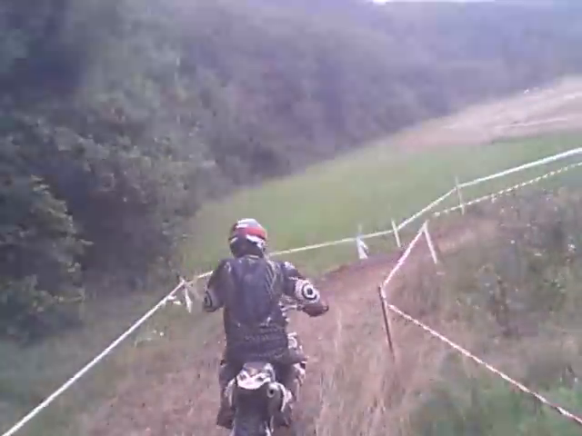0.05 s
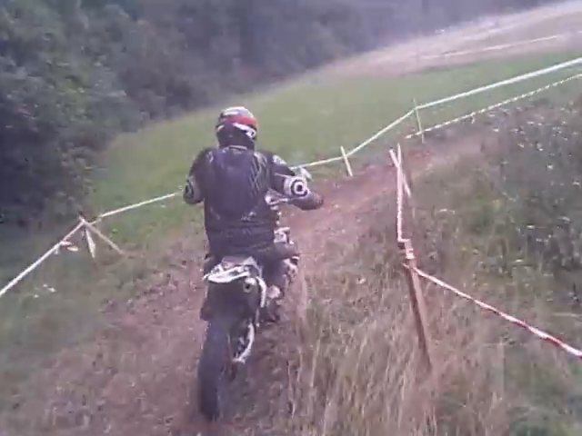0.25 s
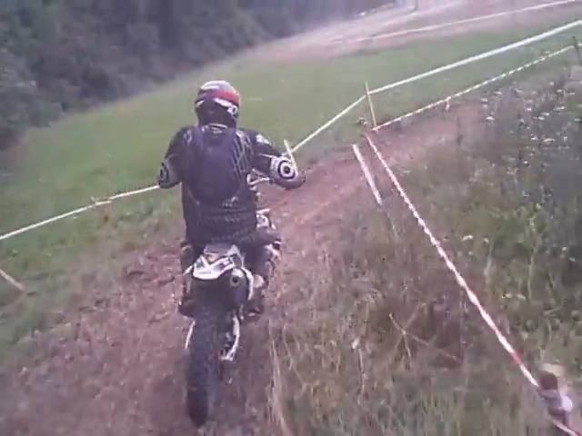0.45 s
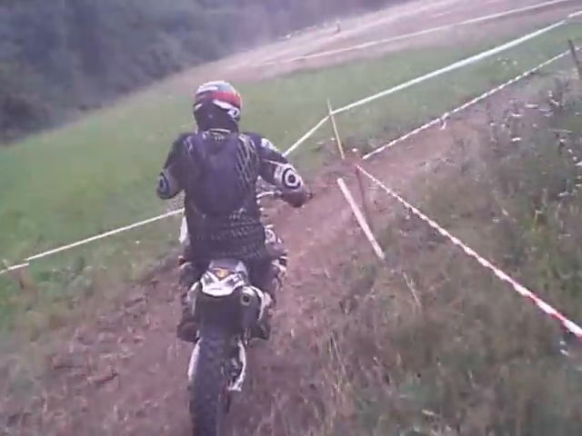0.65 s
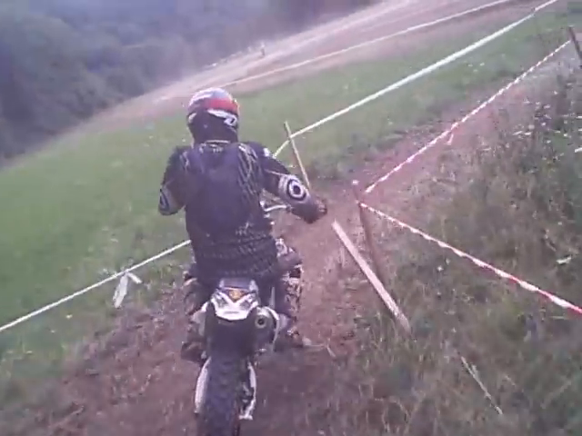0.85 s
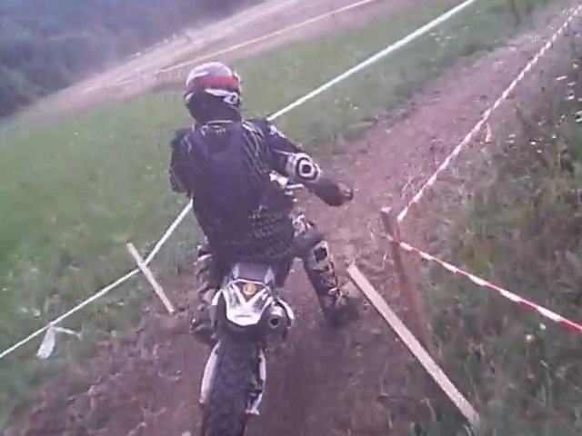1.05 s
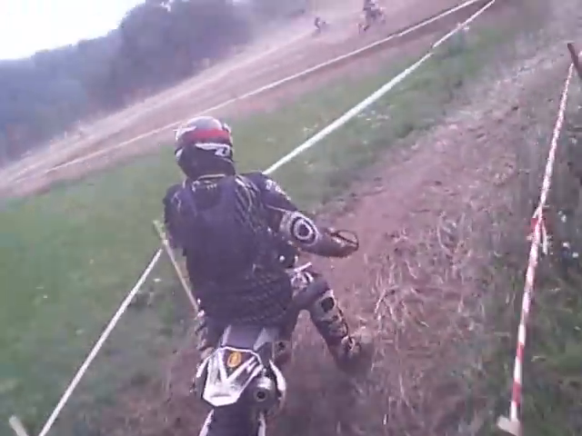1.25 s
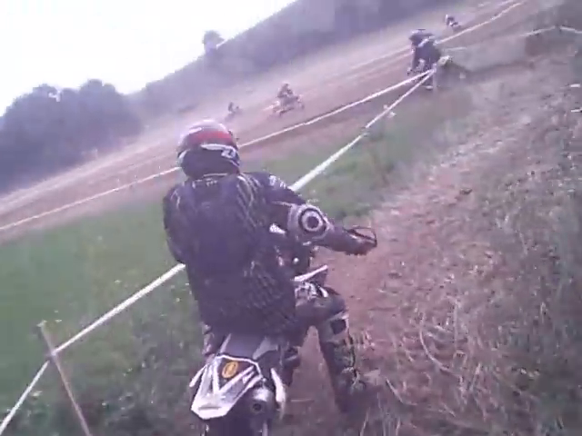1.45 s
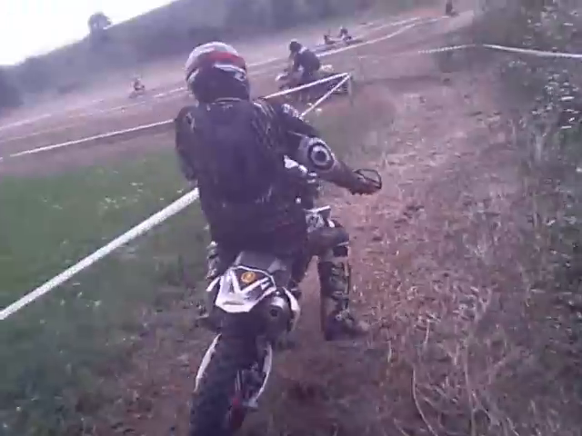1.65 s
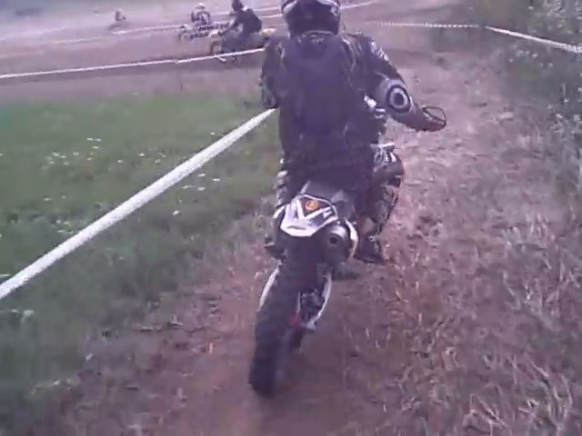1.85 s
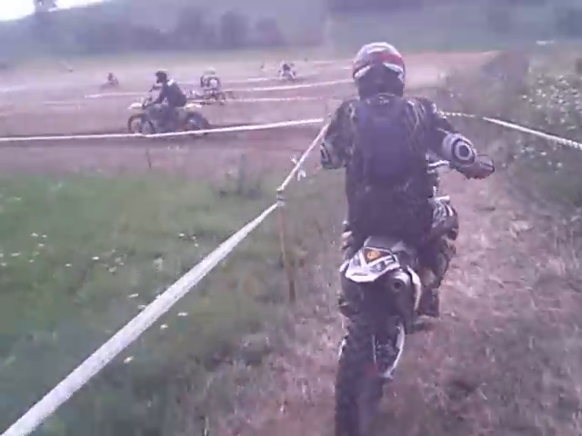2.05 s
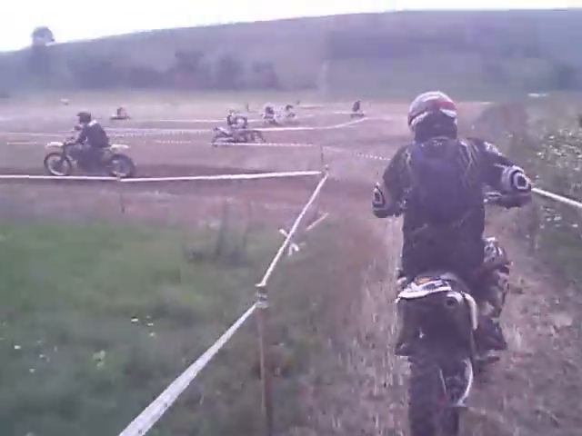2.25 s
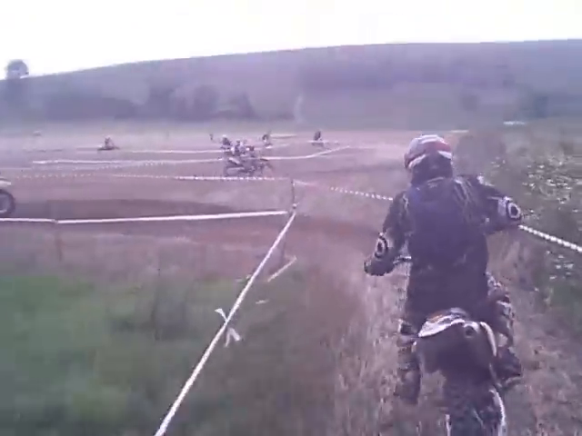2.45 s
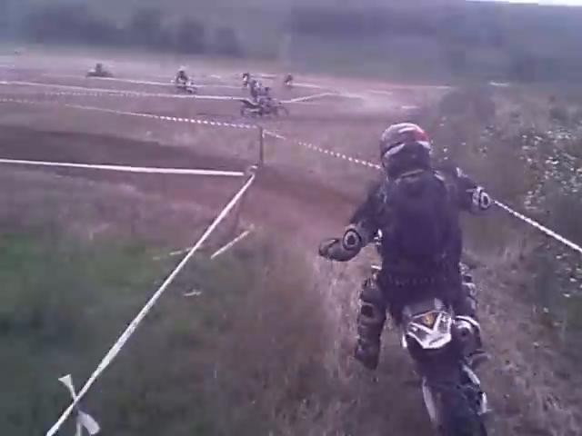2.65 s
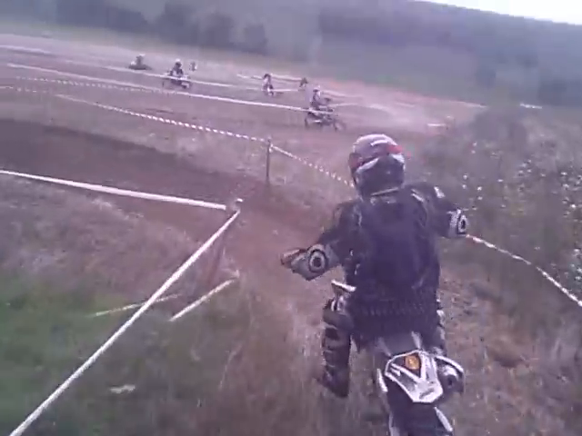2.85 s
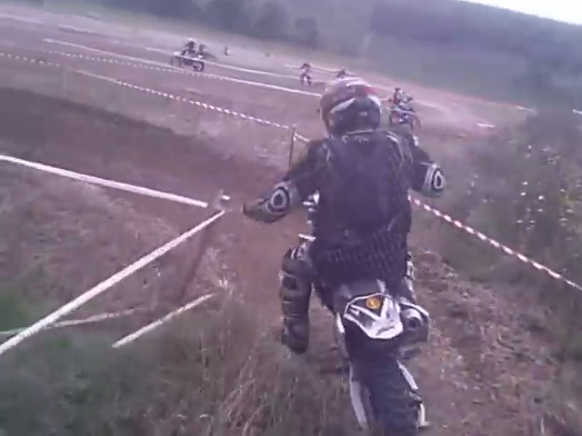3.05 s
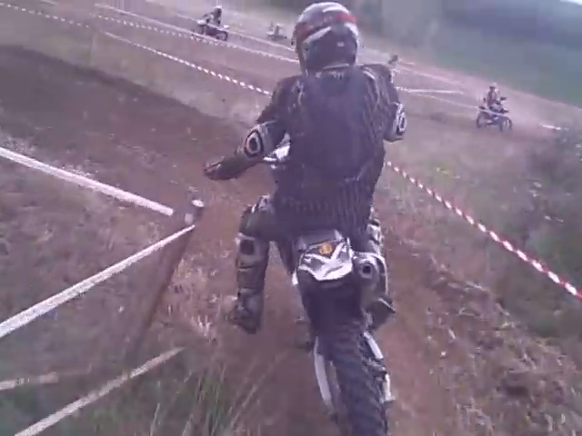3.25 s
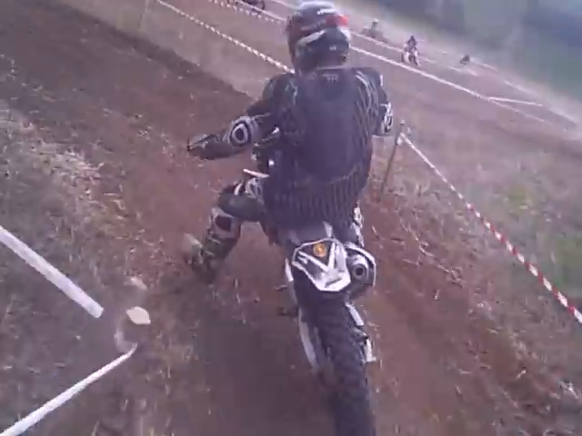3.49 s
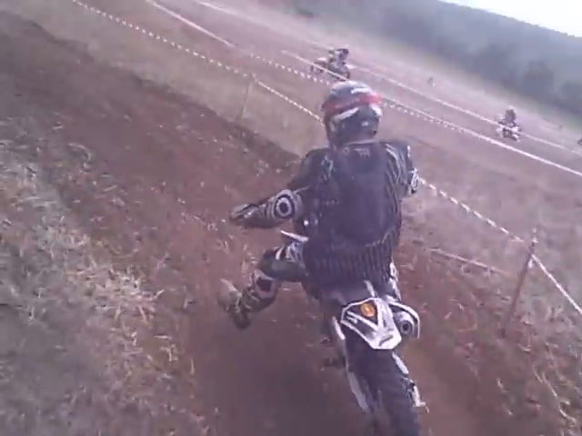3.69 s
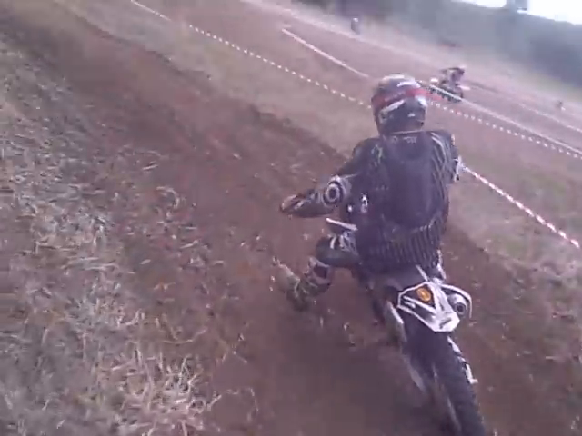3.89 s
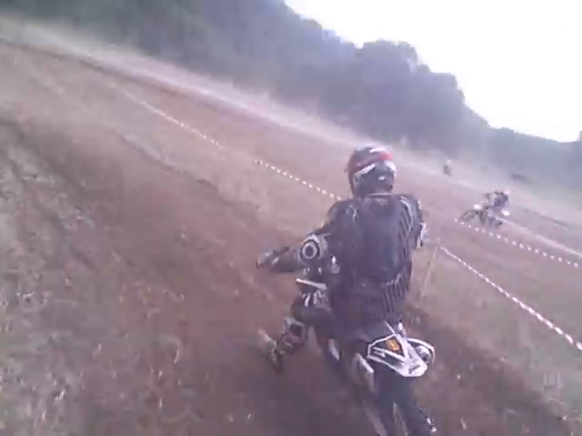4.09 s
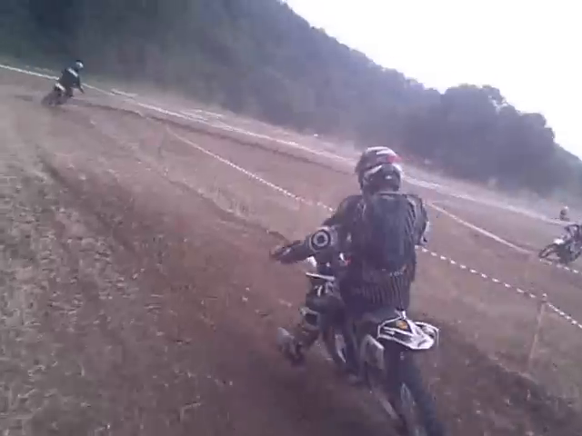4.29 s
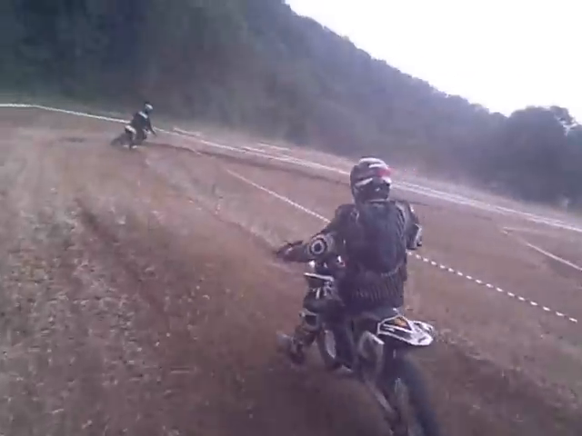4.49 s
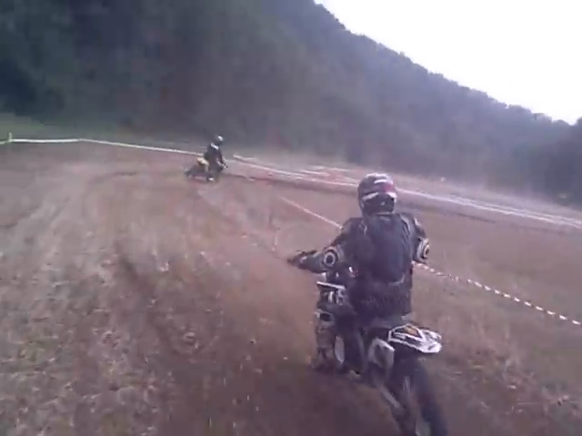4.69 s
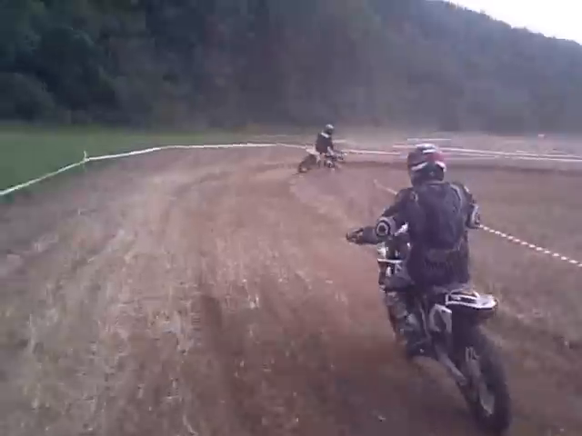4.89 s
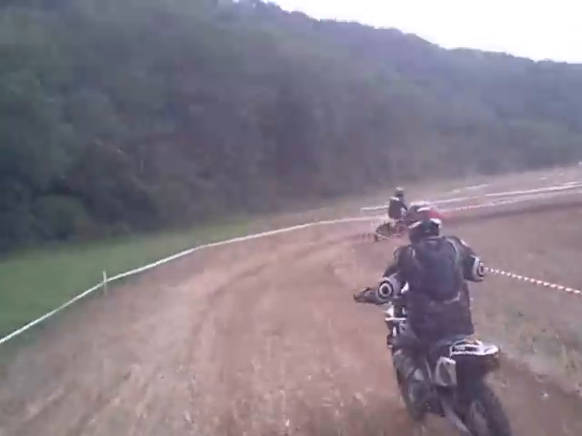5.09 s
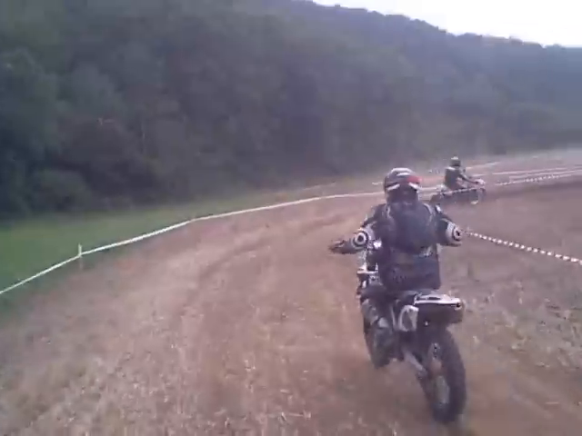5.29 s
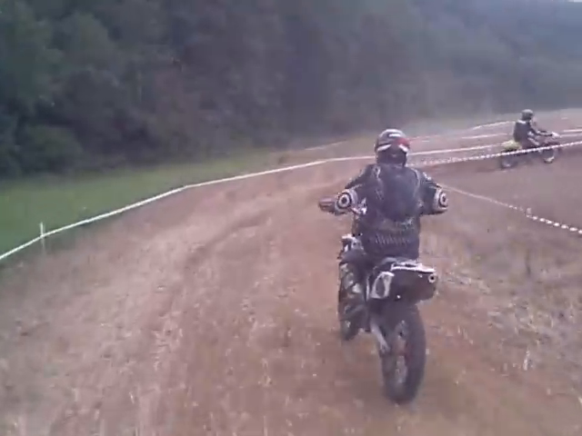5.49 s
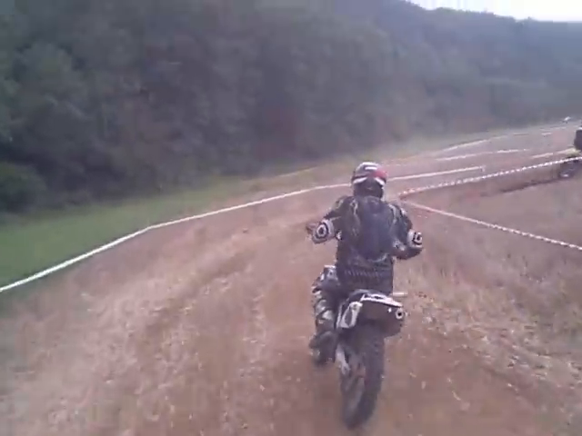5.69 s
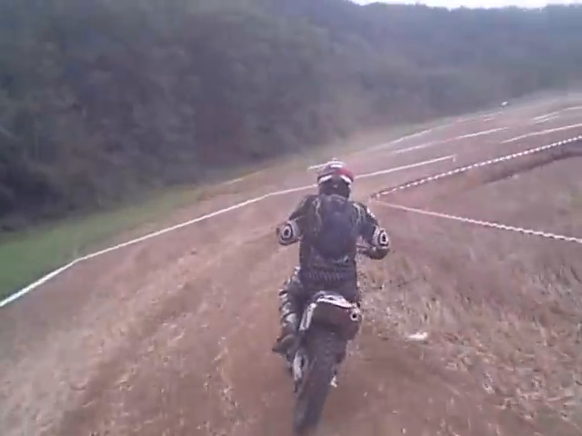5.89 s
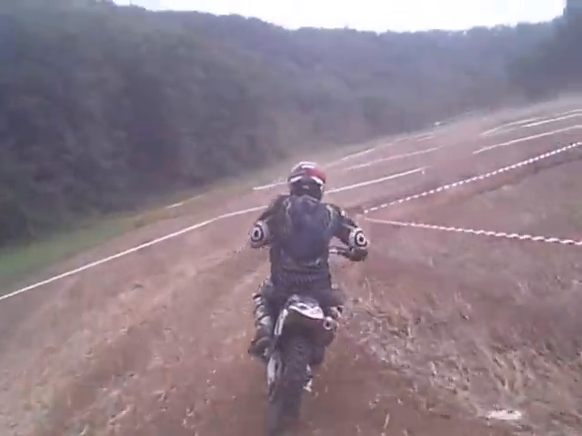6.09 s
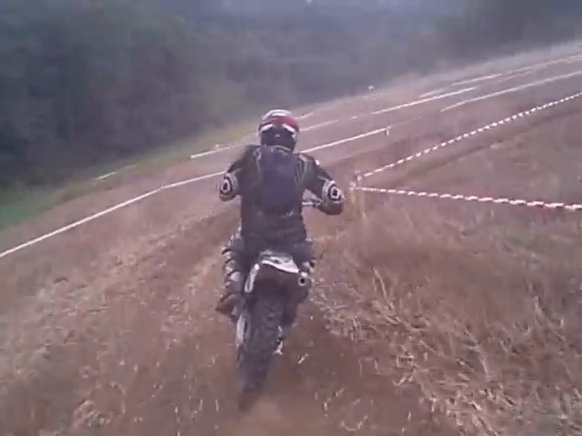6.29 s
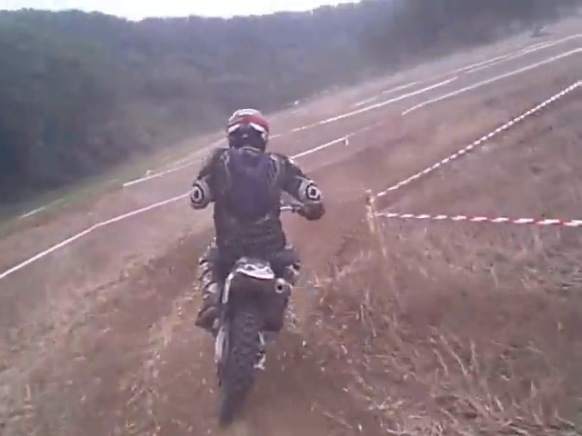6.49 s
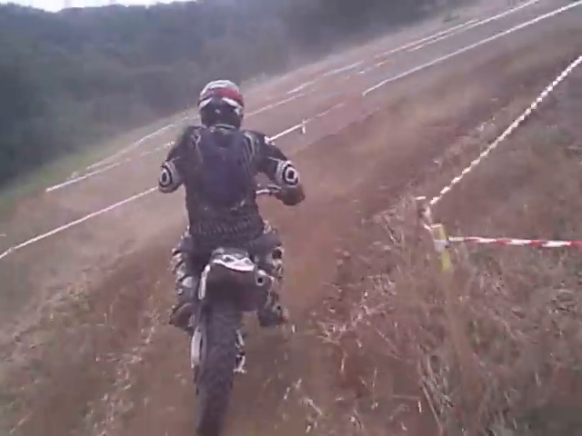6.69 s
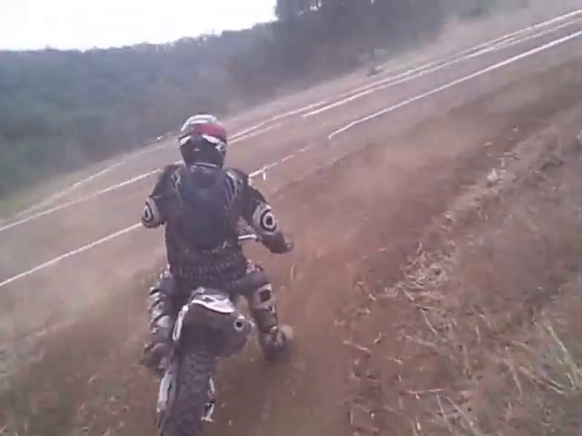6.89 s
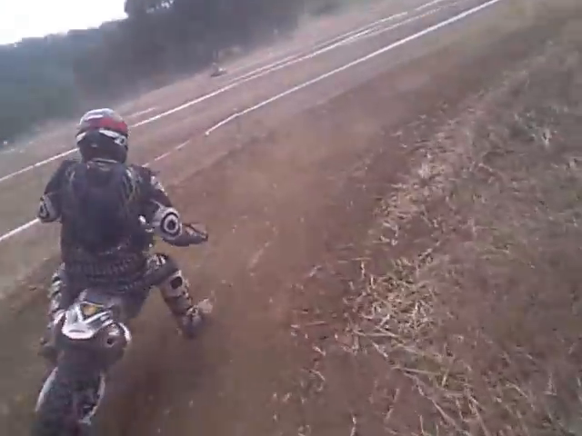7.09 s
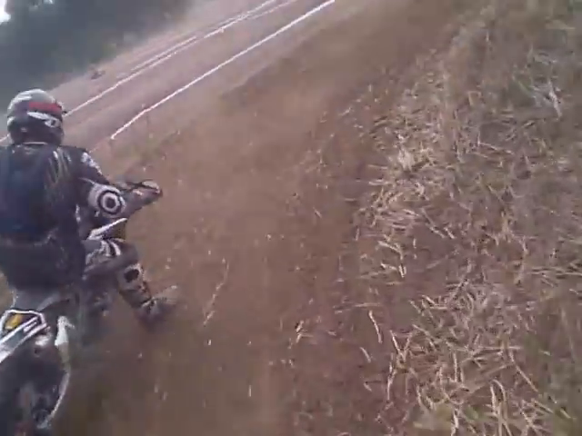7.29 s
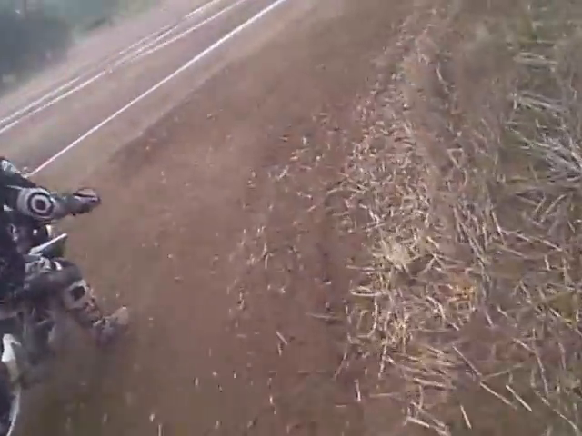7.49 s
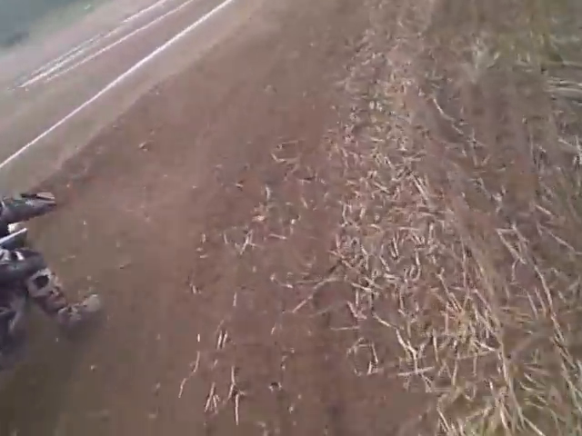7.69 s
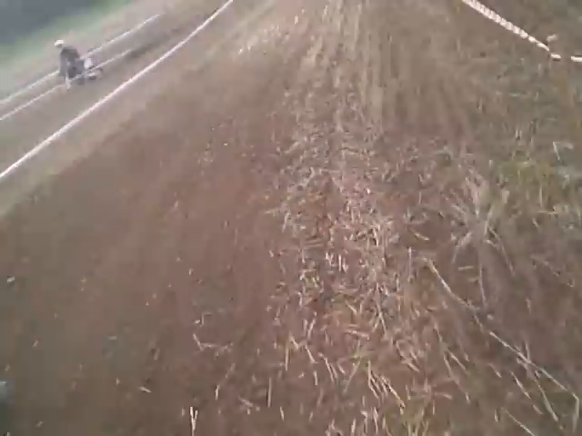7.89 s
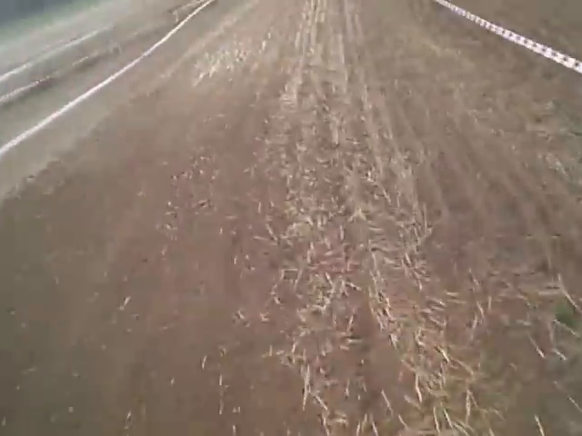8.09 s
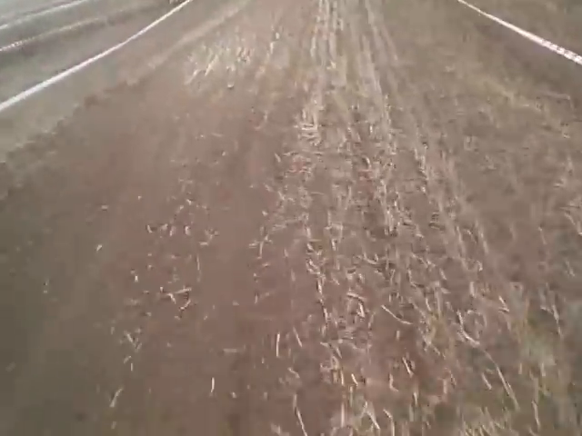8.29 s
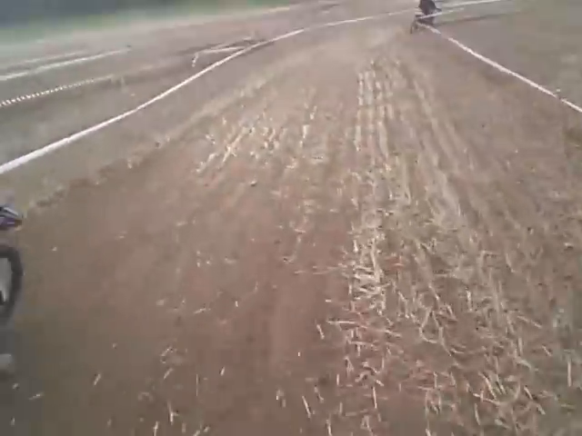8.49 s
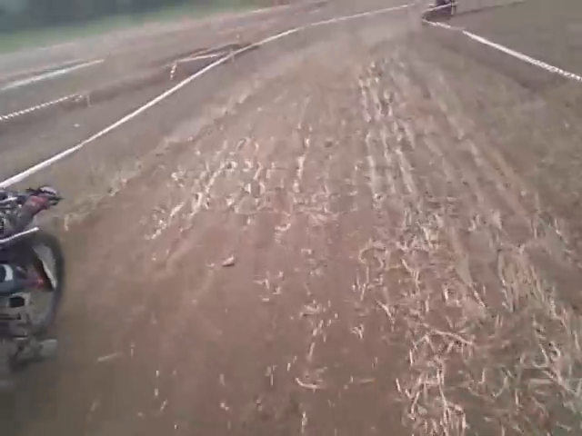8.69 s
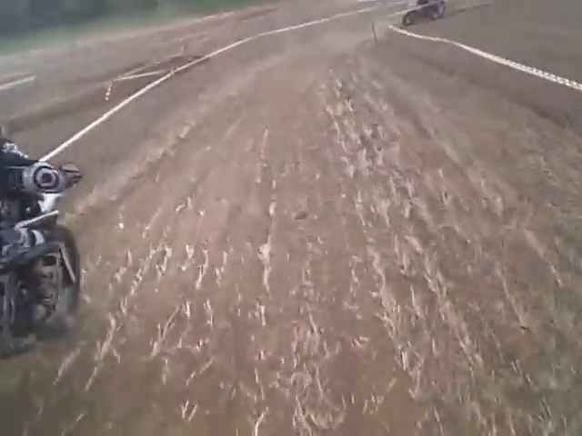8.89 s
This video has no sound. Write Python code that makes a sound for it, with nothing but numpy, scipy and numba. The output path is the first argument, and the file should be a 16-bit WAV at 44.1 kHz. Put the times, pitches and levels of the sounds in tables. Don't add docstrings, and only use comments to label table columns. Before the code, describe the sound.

From a sealed helmet camera, a muffled engine drones and roars while a leading dirt bike rasps in bursts and dirt ticks against the case.

```python
import sys
import numpy as np
from scipy import signal
from scipy.fft import rfft, irfft
from scipy.io import wavfile
from scipy.ndimage import uniform_filter1d
from numba import njit

SR = 44100
rng = np.random.default_rng(int(sys.argv[2]) if len(sys.argv) > 2 else 0)


def transcribe(signal):
    frames = np.atleast_2d(signal).T
    limited = np.clip(frames, -1, 1)
    pcm = np.round(limited * 32767).astype(np.int16)
    wavfile.write(sys.argv[1], SR, pcm)


def volts(x):
    e = np.asarray(x, float) / 20
    return 10 ** e


N = 394630
TIME = np.arange(N) / SR

# (frequency [Hz], level [dB])
CASE_TONE = [(470, -55.5), (800, -15.5), (1250, -8), (1450, 1.5), (2400, -15), (3080, -18), (3550, -17.5),
             (4680, -20), (6080, -8), (6860, -0.5), (7660, 2.5), (8550, -4.5), (11000, -27.5), (14300, -17),
             (22000, -120)]
# (frequency [Hz], level [dB])
FRAME_TONE = [(60, 1.5), (100, 3), (230, -8), (300, 0.5), (360, -8), (600, -8), (850, -6.5), (1000, -1.5),
              (1300, -29.5)]
# (frequency [Hz], level [dB])
SHAKE_TONE = [(2, -2), (6, 4.5), (14, -7), (24, -14), (45, -17.5), (60, -15), (80, -23.5), (200, -63.5)]
# (time [s], length [s], shake of the case [dB], tyre noise [dB])
RUTS = [(0.0, 0.033, -5, 3), (0.472, 0.026, -1, 3), (0.678, 0.02, 3.5, 2.5), (1.543, 0.27, 3.5, 0),
        (2.394, 0.051, 8.5, 4), (2.746, 0.17, 6, 0.5), (3.077, 0.19, 1.5, 0.5), (3.299, 0.028, 1, 2),
        (3.5, .1, 6, 1.5), (4.643, .05, 1, 4.5), (4.98, .06, 2, 0), (5.32, 0.037, -1, 2),
        (5.743, 0.077, -3.5, 1), (5.94, 0.034, -2, 2), (6.146, 0.055, -0.5, 2.5), (6.3, .03, 0, 1.5),
        (6.477, .04, -2, 4.5), (7.75, 0.034, -3, 3.5), (7.966, .04, 1, 1.5), (8.24, .03, 5, 4),
        (8.703, 0.11, 2, 3.5)]
BUFFET_DB, BUFFET_DB_PER_S = -54, -0.2

# (time [s], level [dB], length [s])
FAR_SWELLS = [
    (.05, -68.5, 0.093),
    (0.494, -66, .07),
    (0.675, -66, 0.042),
    (5.98, -68.5, 0.13),
    (6.68, -73, 0.11),
]
FAR_HZ, FAR_LO_HZ, FAR_HI_HZ = 88.3, 700, 1200
# (time [s], peak level [dB], ringing frequency [Hz])
KNOCKS = [
    (1.221, -48, 1210),
    (2.348, -57, 100),
    (3.451, -50, 120),
    (5.254, -29, 2636),
    (8.234, -39, 807),
]
# (time [s], peak level [dB], length [s])
DIRT_HITS = [
    (0.628, -54.5, 0.021),
    (2.9, -55, .04),
    (4.642, -32, 0.042),
    (6.158, -55, .002),
    (6.182, -41.5, 0.0066),
    (6.475, -47.5, 0.015),
    (6.708, -57.5, 0.055),
    (7.751, -35, .02),
    (7.967, -35, .03),
    (8.747, -27.5, 0.0022),
]

# (time [s], firing rate [Hz], drone level [dB])
OWN_ENGINE = [(0, 40.9, -69), (2.0, 46.8, -73), (2.3, 49.9, -78), (2.8, 48.6, -69), (3.5, 51.2, -83),
              (4.3, 65.8, -61.5), (4.59, 81.8, -56), (4.62, 58, -66), (4.8, 58.5, -91),
              (5.42, 74.34, -59.5), (5.63, 74.7, -57.5), (5.8, 60.98, -81), (6.1, 56.3, -72),
              (7.3, 53.6, -72), (7.56, 69, -66), (7.63, 52.1, -89), (8.3, 76.2, -62), (8.95, 82.4, -62.5)]
# (time [s], intake hiss level [dB])
OWN_THROTTLE = [(0, -60.5), (1.0, -60), (1.85, -47), (2.08, -47), (2.13, -50), (2.99, -55), (3.3, -51.5),
                (3.95, -51), (4.55, -40), (4.63, -38.5), (5.59, -36), (5.66, -51), (6.75, -59.5),
                (7.15, -56.5), (7.5, -34.5), (8.2, -38.5), (8.74, -36.5), (8.95, -45.5)]
CUT_S, CUT_LENGTH_S, CUT_DB = 7.665, 0.074, -13.5
LOAD_DB = -50
ROAR_DB, ROAR_FOLLOWS = -53, 0.52
RUMBLE_DB, RUMBLE_FOLLOWS, RUT_RUMBLE = -67, 0.61, 1.4
WHINE_DB, WHINE_FOLLOWS, WHINE_HZ, WHINE_WIDTH_HZ = -76, 0.98, 470, 35
DRONE_WANDER_DB = 2.2
# (start [s], end [s], share at start [0-1], share at end [0-1])
RATTLES = [
    (4.69, 5.3, 0, 0),
    (5.82, 6.3, 0.41, .15),
    (6.287, 6.773, 0.35, 0.59),
    (7.79, 8.305, .3, 0),
]
RATTLE_IDLE, RATTLE_ROAR_DB = 0.042, 3.5

# (time [s], bark level [dB], pipe ringing frequency [Hz], how squarely the tailpipe faces the camera [dB])
OTHER_SOUND = [
    [(1.25, -59, 1510, 2), (1.37, -57, 1530, 4), (1.6, -50, 1570, 4), (1.9, -49, 1560, 1.5),
     (2.12, -47, 1530, -3)],
    [(3.04, -58, 1527, -1), (3.22, -51, 1550, 1.5), (3.55, -56, 1560, 4), (3.72, -51, 1530, -5),
     (4.1, -52, 1550, -1.5), (4.4, -41, 1560, -10), (4.7, -43.5, 1464, -0.5), (5.28, -45.5, 1600, -8),
     (5.44, -53, 1720, 9)],
    [(7.0, -66, 1480, -1), (7.2, -49, 1560, 1), (7.6, -54.5, 1560, 12.5), (7.78, -39.5, 1480, 1),
     (8.19, -44.5, 1694, -1), (8.3, -46.5, 1620, 6), (8.42, -43, 1652, 2), (8.82, -43.5, 1748, 1),
     (8.94, -69, 1622, 0)],
]
# (time [s], firing rate [Hz])
OTHER_REVS = [
    [(1.237, 47.78), (1.297, 44.61), (1.597, 39.9), (1.817, 44.95), (1.917, 44.73), (2.12, 47.65)],
    [(3.022, 39.43), (3.102, 37.6), (3.822, 47.84), (4.062, 47.14), (4.522, 61.82), (4.742, 61.59),
     (4.862, 66.77), (5.322, 74.95), (5.44, 69.68)],
    [(6.996, 45.5), (7.216, 53.64), (7.296, 48.87), (7.656, 54.26), (7.956, 65.59), (8.256, 83.92),
     (8.576, 87.99), (8.656, 96.33), (8.94, 83.15)],
]
# (time [s], level against their neighbours [dB])
POPS = [(1.392, 4.7), (1.866, -17), (1.888, 2), (1.955, 2.5), (1.999, -4), (2.063, 2.5), (3.152, 6.5),
        (3.204, 5.3), (3.23, -5.8), (3.402, 1), (3.424, 4), (3.518, 0), (3.972, 2), (4.036, -20),
        (4.057, 8.5), (4.078, 4), (4.099, 5), (4.2, 8), (4.275, 7.5), (4.382, -4), (4.435, 1.5), (5.183, 1),
        (5.223, -15), (7.199, -2.5), (8.208, 5), (8.864, 5.3)]
# (time [s], level [dB], length [s])
BOOMS = [
    (2.02, 7, 0.1),
    (2.4, 4.5, .12),
    (3.15, 0, 0.092),
    (4.22, 13, 0.044),
    (4.57, 0, .04),
    (7.25, 0.5, 0.19),
    (7.86, 3, 0.045),
]
COAST_END_S, COAST_END_HZ = 2.54, 51.5
CRUISE_HZ = 45
RASP_DB, RASP_DB_PER_HZ, CRACK_DB, CRACK_DB_PER_HZ = -13, 0.228, -4, 0.2188
PIPE_WANDER_HZ, GAS_WANDER_DB = 40, 1.5
THUMP_DB, THUMP_FOLLOWS, THUMP_FADE_DB_PER_HZ = -70, 0.45, 0.26


def unit(x):
    return x / np.sqrt(np.mean(x ** 2))


def noise():
    return rng.standard_normal(N)


def curves(rows):
    s, *columns = np.transpose(rows)
    return [np.interp(TIME, s, c) for c in columns]


def bumps(rows):
    return sum(height * np.exp(-.5 * ((TIME - s) / length) ** 2) for s, height, length in rows)


def loudness_bumps(rows):
    return bumps([(s, volts(db), length) for s, db, length in rows])


def ruts(axis):
    return bumps(np.array(RUTS)[:, [0, axis, 1]])


def walk(rate):
    k = int(SR / rate)
    steps = np.repeat(rng.standard_normal(N // k + 1), k)
    smooth = uniform_filter1d(uniform_filter1d(steps, k), k)
    return unit(smooth[:N])


def colour(x, points):
    size = 2 ** 15
    hz, db = np.transpose(points)
    bins_hz = np.fft.rfftfreq(size, 1 / SR) + 1
    gain = volts(np.interp(np.log(bins_hz), np.log(hz), db))
    cep = irfft(np.log(gain), size)
    cep[1:size // 2] *= 2
    cep[size // 2 + 1:] = 0
    response = irfft(np.exp(rfft(cep)), size)
    return signal.fftconvolve(x, response)[:N]


def band(x, lo_hz, hi_hz):
    return signal.sosfilt(signal.butter(2, [lo_hz, hi_hz], "bandpass", fs=SR, output="sos"), x)


@njit
def ring(x, hz, width):
    y, b, l = np.empty(len(x)), 0., 0.
    for i in range(len(x)):
        g, k = np.tan(np.pi * hz[i] / SR), width / hz[i]
        v = (b + g * (x[i] - l)) / (1 + g * (g + k))
        b, l, y[i] = 2 * v - b, l + 2 * g * v, k * v
    return y


def steady_ring(x, hz, width):
    return ring(x, np.full(N, float(hz)), float(width))


def firings(turns, hz, jitter, scatter_db):
    at = np.flatnonzero(np.diff(np.floor(turns)) > 0)
    chance = rng.standard_normal((2000, 2))[:len(at)]
    at = np.clip(at + (jitter * chance[:, 0] * SR / hz[at]).astype(int), 0, N - 1)
    size_db = scatter_db * 45 / np.maximum(hz[at], 45) * chance[:, 1]
    out = np.zeros(N)
    out[at] = volts(size_db) * np.sqrt(SR / hz[at])
    return out


def puff(pulses, rise_s, fall_s):
    t = np.arange(2048) / SR
    return signal.fftconvolve(pulses, (1 - np.exp(-t / rise_s)) * np.exp(-t / fall_s))[:N]


def buffet():
    level_db = BUFFET_DB + BUFFET_DB_PER_S * TIME + ruts(axis=2)
    return volts(level_db) * unit(colour(noise(), SHAKE_TONE))


def far_bike():
    hz = FAR_HZ * (1 + .05 * walk(3))
    pulses = firings(np.cumsum(hz / SR), hz, jitter=.03, scatter_db=4.0)
    buzz = unit(band(unit(pulses) + noise(), FAR_LO_HZ, FAR_HI_HZ))
    return loudness_bumps(FAR_SWELLS) * buzz


def knocks():
    out = np.zeros(N)
    for s, db, hz in KNOCKS:
        t = np.maximum(TIME - s, 0)
        out += volts(db) * np.exp(-t * hz / 2.0) * np.sin(2 * np.pi * hz * t)
    return out


def spray():
    grit = noise() * volts(3.1 * walk(900))
    return loudness_bumps(DIRT_HITS) * unit(band(colour(grit, CASE_TONE), 4900, 14500))


def own_drone(cycle):
    # (order, level [dB])
    levels = [(1, -18), (2, -2.5), (3, -8.5), (4, -3.0), (5, -15), (6, -19.5), (10, -15.5), (12, -17), (14, -19)]
    orders = sum(volts(db + DRONE_WANDER_DB * walk(5)) * np.sin(k * cycle) for k, db in levels)
    return .5 * orders + 1.5 * steady_ring(orders, 303, 45)


def intake_hiss(flutter):
    rush = unit(band(colour(noise(), CASE_TONE), 3630, 11700))
    return rush * flutter * volts(0.79 * walk(400))


def roar_and_valves(cycle, hz, clatter, flutter):
    ticking = firings(cycle / np.pi, 2 * hz, jitter=.015, scatter_db=2.5)
    ticks = unit(puff(ticking, rise_s=.0003, fall_s=.0013))
    clatter = np.clip(clatter, 0, 1)
    air = (np.sqrt(1 - clatter) + np.sqrt(clatter) * ticks) * noise()
    low_wall = unit(ring(air, 1470 + 25 * walk(6), 160.))
    high_wall = unit(ring(air, 3470 + 50 * walk(5), 200.))
    walls = low_wall + .3 * high_wall
    rush = unit(unit(band(colour(air, CASE_TONE), 887, 5000)) + .5 * walls) * flutter
    rattle = unit(steady_ring(air, 2500, 620) + steady_ring(air, 3450, 290))
    return rush + 0.86 * clatter ** 2 * rattle


def own_bike():
    hz, drone_db = curves(OWN_ENGINE)
    hiss_db = curves(OWN_THROTTLE)[0] + CUT_DB * np.exp(-((TIME - CUT_S) / CUT_LENGTH_S) ** 4)
    load = hiss_db - LOAD_DB
    slack = sum(np.interp(TIME, [a, b], [p, q], left=0, right=0) for a, b, p, q in RATTLES)
    clatter = RATTLE_IDLE + uniform_filter1d(slack, size=1500)
    tyres_db = ruts(axis=3)
    roar_db = ROAR_DB + ROAR_FOLLOWS * load + RATTLE_ROAR_DB * clatter + tyres_db
    rumble_db = RUMBLE_DB + RUMBLE_FOLLOWS * load + RUT_RUMBLE * tyres_db
    off_pitch = (8 * hz - WHINE_HZ) / WHINE_WIDTH_HZ
    whine_db = WHINE_DB + WHINE_FOLLOWS * load - 10 * np.log10(1 + off_pitch ** 2)
    cycle = 2 * np.pi * np.cumsum(hz / SR)
    flutter = volts(0.74 * walk(40))
    drone = volts(drone_db) * own_drone(cycle)
    whine = volts(whine_db) * np.sin(8 * cycle)
    hiss = volts(hiss_db) * intake_hiss(flutter)
    roar = volts(roar_db) * roar_and_valves(cycle, hz, clatter, flutter)
    rumble = volts(rumble_db) * unit(band(colour(noise(), FRAME_TONE), 119, 1360))
    return drone + whine + hiss + roar + rumble


def exhaust_blast(turns, hz, ring_hz, rasp_db, crack_db):
    pulses = firings(turns, hz, jitter=.006, scatter_db=1.6)
    gas = unit(puff(pulses, rise_s=0.0012, fall_s=0.0016) * noise())
    blast = .35 * gas + unit(pulses)
    front = (hz / 90) ** 1.3 * unit(band(blast, 1510, 2180))
    pipe = unit(ring(ring(blast, ring_hz, 260.), .98 * ring_hz, 400.))
    bark = pipe + .75 * front
    rasp = steady_ring(1.5 * gas + blast, 2430, 320) + 1.13 * steady_ring(gas + .5 * blast, 3500, 780)
    crack = band(colour(gas, CASE_TONE), 3230, 10300)
    return unit(bark) + volts(rasp_db) * unit(rasp) + volts(crack_db) * unit(crack)


def pipe_thump(turns, hz):
    even = firings(turns, hz, jitter=.004, scatter_db=1.5)
    low = unit(band(even, 163, 236))
    middle = unit(steady_ring(steady_ring(even, 305, 31), 305, 53))
    high = unit(band(even, 510, 670))
    return low + 0.76 * middle + 0.32 * high


def other_bike():
    coast = [(COAST_END_S, COAST_END_HZ)]
    hz, = curves(np.concatenate([OTHER_REVS[0], coast, *OTHER_REVS[1:]]))
    bark_db, ring_hz, facing_db = curves(np.concatenate(OTHER_SOUND))
    rise = hz - CRUISE_HZ
    rasp_db = RASP_DB + RASP_DB_PER_HZ * rise + 0.63 * facing_db + GAS_WANDER_DB * walk(9)
    crack_db = CRACK_DB + CRACK_DB_PER_HZ * rise + facing_db + GAS_WANDER_DB * walk(9)
    ring_hz = ring_hz + PIPE_WANDER_HZ * walk(12)
    thump_db = THUMP_DB + THUMP_FOLLOWS * (bark_db - LOAD_DB) - THUMP_FADE_DB_PER_HZ * rise + bumps(BOOMS)
    bark_db = bark_db + sum(db * np.exp(-((TIME - s) / .008) ** 4) for s, db in POPS)
    turns, throttle = np.cumsum(hz / SR), np.zeros(N)
    for burst in OTHER_REVS:
        start, stop = int(burst[0][0] * SR), int(burst[-1][0] * SR)
        turns[start:] -= turns[start]
        throttle[start:stop] = 1
    coasting = (TIME > OTHER_REVS[0][0][0]) & (TIME < COAST_END_S)
    rolling = uniform_filter1d(np.maximum(throttle, coasting), size=2000)
    throttle = uniform_filter1d(throttle, size=2000)
    blast = exhaust_blast(turns, hz, ring_hz, rasp_db, crack_db)
    thump = pipe_thump(turns, hz)
    return throttle * volts(bark_db) * blast + rolling * volts(thump_db) * thump


def scene():
    return (buffet() + far_bike() + knocks() + spray() + own_bike() + other_bike())[None]


def band_limit(x):
    return signal.sosfilt(signal.butter(12, 11310, fs=SR, output="sos"), x)


def record(dry):
    top_cut = signal.ellip(10, .2, 80, 10900, fs=SR, output="sos")
    offset = -.0041
    mix = signal.sosfilt(top_cut, dry) + offset
    return band_limit(mix)


dry = scene()
out = record(dry)
transcribe(out)
```